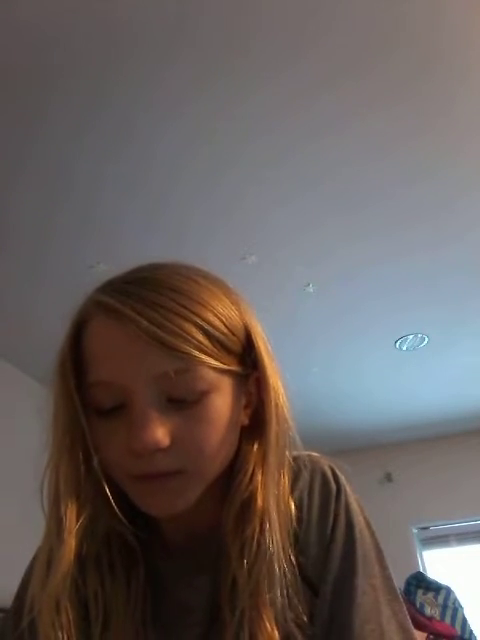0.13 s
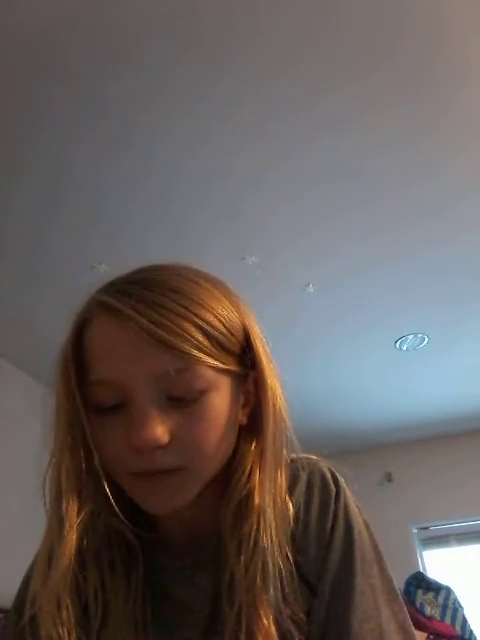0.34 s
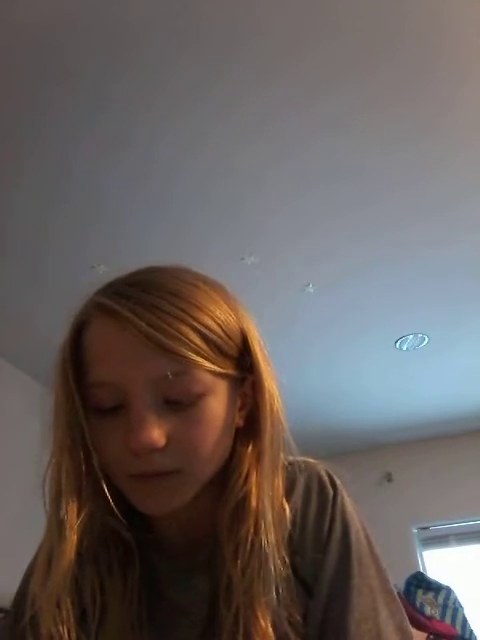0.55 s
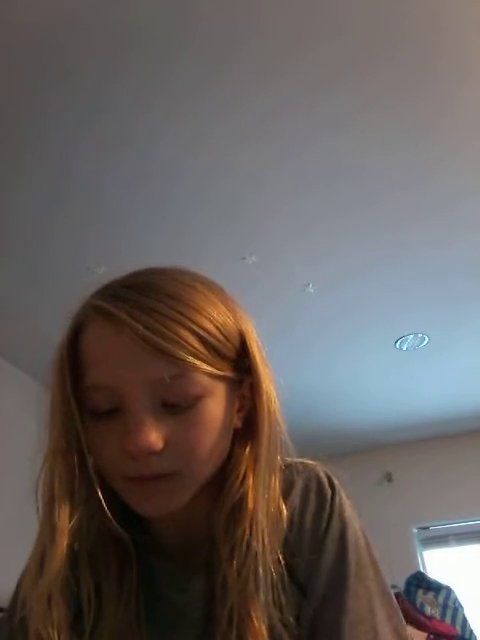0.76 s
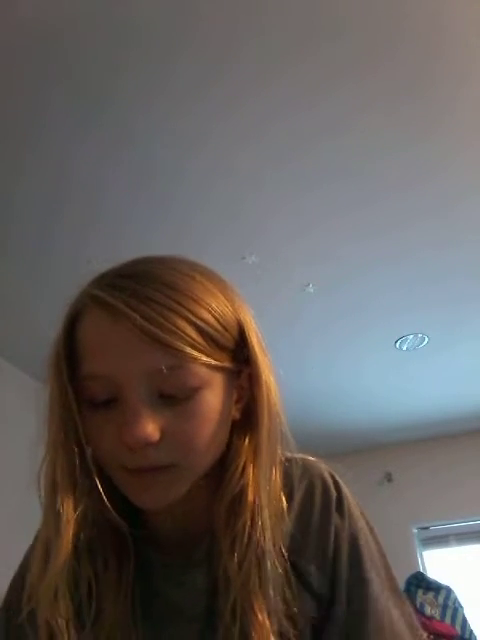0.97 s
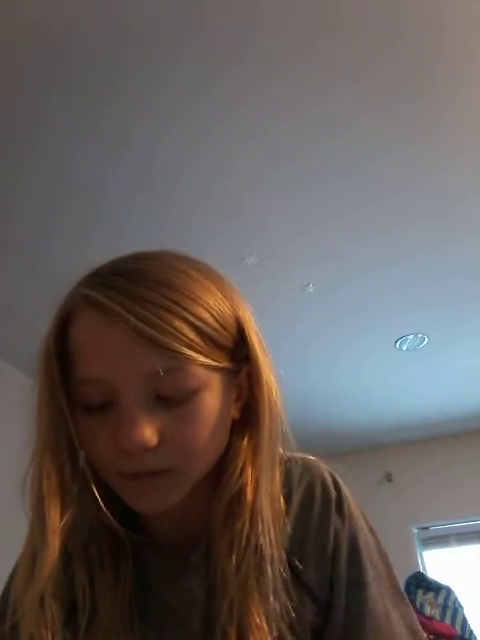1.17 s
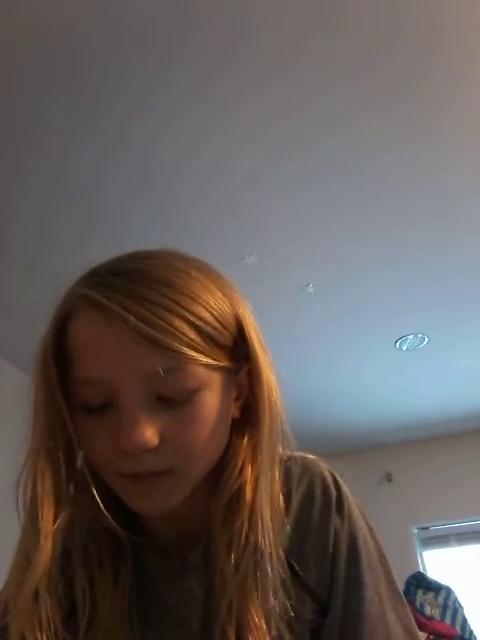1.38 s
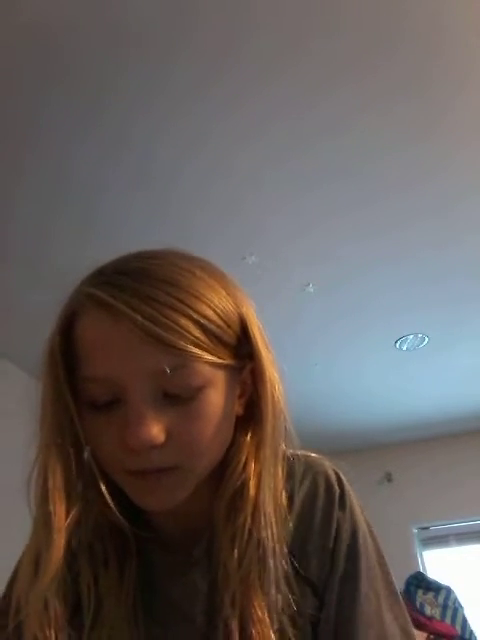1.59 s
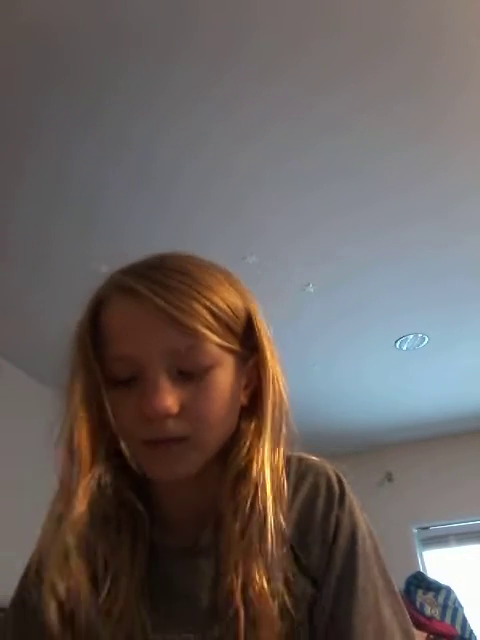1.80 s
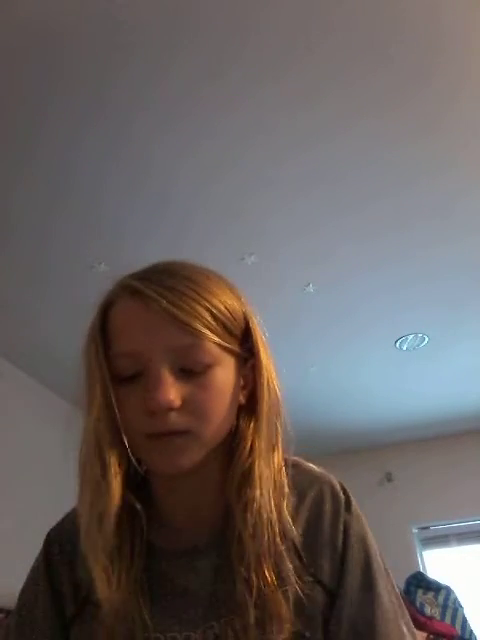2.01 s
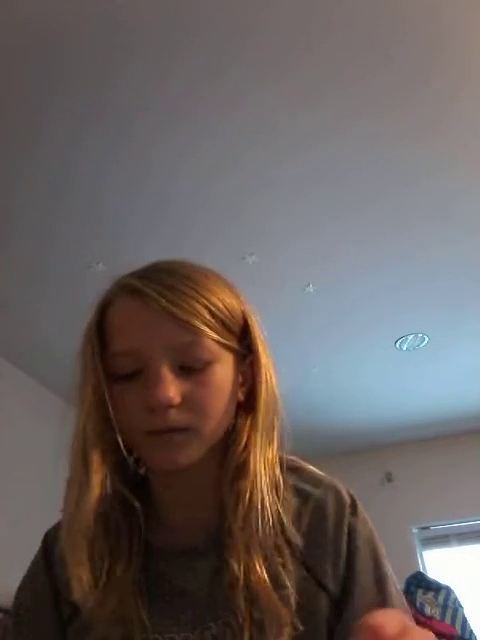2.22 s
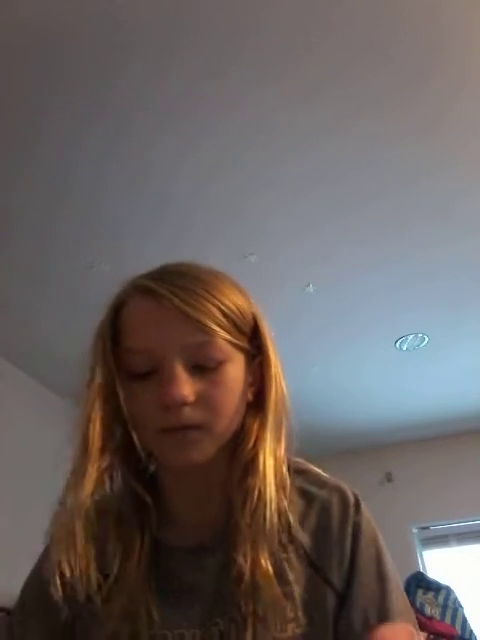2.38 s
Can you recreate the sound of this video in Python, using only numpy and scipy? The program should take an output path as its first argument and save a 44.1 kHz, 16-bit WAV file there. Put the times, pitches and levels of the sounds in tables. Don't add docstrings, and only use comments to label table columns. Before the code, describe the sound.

A silicone push toy is popped by hand: three fast clusters of sharp, hollow snaps at uneven intervals, with faint finger rubbing and soft table thuds, close to a small dull microphone in a quiet bedroom.

```python
import sys
import numpy as np
from scipy import signal
from scipy.fft import rfft, irfft
from scipy.io import wavfile
from scipy.ndimage import uniform_filter1d

SR = 44100
rng = np.random.default_rng(int(sys.argv[2]) if len(sys.argv) > 2 else 0)


def gain_from_db(level_db):
    decades = np.asarray(level_db, float) / 20
    return 10 ** decades


def output_pcm(signal):
    pcm = np.clip(np.atleast_2d(signal).T, -1, 1) * 32767
    wavfile.write(sys.argv[1], SR, np.round(pcm).astype(np.int16))


N = 108045


def level(x, db):
    return x * gain_from_db(db) / np.sqrt(np.mean(x ** 2))


def butter(x, order, hz, kind="low"):
    return signal.sosfilt(signal.butter(order, hz, kind, fs=SR, output="sos"), x)


def band(x, hz, width):
    return butter(x, 2, [hz / (1 + width), min(hz * (1 + width), .45 * SR)], "band")


def decay(t, t60_s):
    return np.exp(-np.log(1000) * t / t60_s)


def add(out, start_s, shape):
    center = int(start_s * SR)
    i = np.arange(max(center - 4000, 0), min(center + 4000, N))
    out[i] += shape(i / SR - start_s)


def wander(rate_per_s):
    hold = int(SR / rate_per_s)
    steps = np.repeat(rng.standard_normal(N // hold + 1), hold)
    return 1.3 * uniform_filter1d(uniform_filter1d(steps, hold), hold)[:N]


# pitch_hz [Hz], level_db [dB per Hz]
FLOOR_COLOR = [(40, -5), (64, -1.5), (156, -9.5), (392, -19), (955, -19.5), (3000, -24.5), (7000, -33.5),
               (15800, -31)]
FLOOR_DB = -69.5
RUMBLE_HZ, RUMBLE_SWELL_DB = 198, 1
HISS_FLICKER_DB, HISS_FLICKER_PER_S = .6, 50


def floor():
    f = np.maximum(np.fft.rfftfreq(N, 1 / SR), 1)
    pitch_hz, level_db = np.array(FLOOR_COLOR).T
    color = gain_from_db(np.interp(np.log(f), np.log(pitch_hz), level_db, left=-60))
    noise = rfft(rng.standard_normal(N)) * color
    low = 1 / (1 + (f / RUMBLE_HZ) ** 2)
    rumble = irfft(noise * low, N) * gain_from_db(RUMBLE_SWELL_DB * wander(6.6))
    hiss = irfft(noise * (1 - low), N) * gain_from_db(HISS_FLICKER_DB * wander(HISS_FLICKER_PER_S))
    return level(rumble + hiss, FLOOR_DB)


# start_s [s], level_db [dB], pitch_hz [Hz], length_s [s]
TABLE_THUDS = [(0.088, -62.5, 55, 0.1), (.26, -54.5, 90, 0.024), (0.318, -61, 75, .03),
               (.44, -66, 120, 0.011), (0.769, -53, 60, 0.041), (0.901, -65.5, 55, .03),
               (0.982, -58, 250, .015), (.85, -56, 180, .02), (.05, -62, 250, 0.025),
               (1.369, -66, 60, 0.095), (1.373, -69.5, 300, .015), (1.729, -46, 65, 0.018),
               (1.832, -62, 60, 0.037), (1.927, -60, 60, .04), (2.347, -58.5, 60, 0.028),
               (2.401, -56.5, 70, 0.019), (2.411, -68, 210, 0.018)]


def thuds():
    out = np.zeros(N)
    for start_s, level_db, pitch_hz, length_s in TABLE_THUDS:
        add(out, start_s, lambda t: gain_from_db(level_db) * np.sin(2 * np.pi * pitch_hz * t) * np.exp(-(t / length_s) ** 2))
    return out


# start_s [s], length_s [s], level_db [dB], pitch_hz [Hz]
FINGER_RUBS = [(0.41, 0.11, -66, 5200), (0.926, 0.084, -68, 5230), (.97, .14, -70, 6200),
               (1.867, 0.1, -66.5, 4930), (2.349, 0.095, -76, 2500), (2.343, 0.11, -72.5, 6370)]
SLIPS_PER_S, SLIP_SPREAD_DB = 6000, 2


def rubs():
    out, t = np.zeros(N), np.arange(N) / SR
    for start_s, length_s, level_db, pitch_hz in FINGER_RUBS:
        slips = (rng.random(N) < SLIPS_PER_S / SR) * rng.standard_normal(N)
        slips = slips * gain_from_db(SLIP_SPREAD_DB * rng.exponential(size=N))
        stroke = np.sin(np.pi * np.clip((t - start_s) / length_s, 0, 1)) ** 2
        out += level(band(slips, pitch_hz, .2), level_db) * stroke
    return out


# late_s [s], level_db [dB]
ECHO_BOUNCES = [(.0016, -12), (.0041, -13), (.0063, -17), (.0085, -24), (.0117, -21)]
# pitch_hz [Hz], level_db [dB], t60_s [s]
ROOM_BANDS = [(250, -62, .2), (513, -58, 0.45), (850, -44, 0.21), (1345.7, -46, 0.29), (2000, -51, .27),
              (3100, -44.5, 0.31), (4620, -51, .27), (7000, -47, .17)]
ROOM_RISE_S = .004
DIP_ROOM_DB, SKIN_ROOM_DB, TICK_ROOM_DB = -13, -13, 13


def room(dips, skins, ticks):
    t = np.arange(SR // 2) / SR
    tail = np.zeros(len(t))
    for pitch_hz, level_db, t60_s in ROOM_BANDS:
        noise = band(rng.standard_normal(len(t)), pitch_hz, 0.49)
        tail += level(noise, level_db) * decay(t, t60_s)
    tail *= 1 - np.exp(-(t / ROOM_RISE_S) ** 2)
    direct = dips + skins
    near = direct.copy()
    for late_s, level_db in ECHO_BOUNCES:
        near += gain_from_db(level_db) * np.roll(direct, int(late_s * SR))
    send = gain_from_db(DIP_ROOM_DB) * dips + gain_from_db(SKIN_ROOM_DB) * skins + gain_from_db(TICK_ROOM_DB) * ticks
    return near + signal.fftconvolve(send, tail)[:N]


def spit(ticks):
    t = np.arange(SR // 2) / SR
    fall = decay(t, .015) + gain_from_db(-21) * decay(t, .5)
    loudness = signal.fftconvolve(np.abs(ticks), fall)[:N]
    return band(loudness * rng.standard_normal(N), 11500, .4)


def push(t, hz):
    bend = (np.pi * hz * t) ** 2
    return (2 * bend - 1) * np.exp(-bend)


def ring(t, hz, t60_s):
    return (t > 0) * np.sin(2 * np.pi * hz * t) * decay(np.maximum(t, 0), t60_s)


DIP_RING_DB, DIP_RING_T60_S = -19, 0.011


def dome_dip(t, hz):
    body = gain_from_db(-28) * push(t, hz * 0.27)
    return push(t, hz) + body + gain_from_db(DIP_RING_DB) * ring(t, hz, DIP_RING_T60_S)


# pitch_hz [Hz], level_db [dB], t60_s [s], late_s [s]
SKIN_TONES = [(2749, -0.5, 0.0093, -.0004), (5110, 4.5, 0.0039, -.0001), (3964, -3.5, .014, .0012),
              (4400, -11.5, .006, 0.0045), (6756, -18, 0.013, 0), (1401.5, -4.5, 0.0092, .0003),
              (2250, -6.5, 0.007, -.0003), (3300, -1, .005, -.0002), (6275, -13.5, 0.0033, 0),
              (880, -10, .012, .0004)]
SKIN_SCATTER, SKIN_SCATTER_DB = .025, 1.5


def skin_ring(t, chance):
    out = np.zeros(len(t))
    for (pitch_hz, level_db, t60_s, late_s), (detune, boost) in zip(SKIN_TONES, chance):
        tone = ring(t - late_s, pitch_hz * (1 + SKIN_SCATTER * detune), t60_s)
        out += gain_from_db(level_db + SKIN_SCATTER_DB * boost) * tone
    return out


# start_s [s], dip_db [dB], dip_hz [Hz], crack_db [dB]
DOME_POPS = [(.2334, -10, 1450, -12), (.2434, -8, 1450, -10), (.2571, -8, 1450, -10),
             (.7260, -10, 800, -21), (.7325, -8, 950, -22), (.7570, -5.5, 1000, -23),
             (.8435, -38, 1400, -40), (.8545, -46, 500, -60), (.8915, -40, 550, -58),
             (.9790, -57, 1000, -72), (.9700, -60, 900, -76), (.9880, -59, 1000, -76),
             (.9830, -54, 400, -75), (1.6685, -9, 950, -26), (1.6805, -8, 950, -24),
             (1.7002, -10, 950, -28), (1.7068, -10, 1100, -12), (1.7172, -6, 1000, -23),
             (1.7206, -8, 1000, -23), (2.385, -60, 450, -80), (2.412, -55, 500, -78)]
MIC_LAG_S = .00035
SKIN_LOW_HZ = 520


def pops():
    dips, skins, ticks = np.zeros(N), np.zeros(N), np.zeros(N)
    for start_s, dip_db, dip_hz, crack_db in DOME_POPS:
        chance = rng.standard_normal((len(SKIN_TONES), 2))
        add(dips, start_s - MIC_LAG_S, lambda t: gain_from_db(dip_db) * dome_dip(t, dip_hz))
        add(skins, start_s - MIC_LAG_S, lambda t: gain_from_db(crack_db) * skin_ring(t, chance))
        ticks[int(start_s * SR)] = gain_from_db(crack_db)
    return dips, butter(skins, 2, SKIN_LOW_HZ, "high"), butter(ticks, 2, SKIN_LOW_HZ, "high")


def scene():
    dips, skins, ticks = pops()
    near = room(dips, skins, ticks) + rubs()
    near = butter(near, 5, 5750)
    near = butter(near, 14, 7650)
    return (near + gain_from_db(-60) * spit(ticks) + thuds() + floor())[None]


def roll_off(x):
    return signal.sosfilt(signal.butter(12, 16630, fs=SR, output="sos"), x)


def record(dry):
    mix = butter(dry, 3, 50, "high") - .0004
    return roll_off(mix)


dry = scene()
out = record(dry)
output_pcm(out)
```